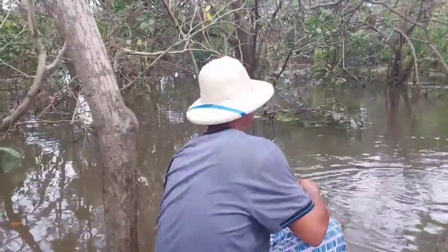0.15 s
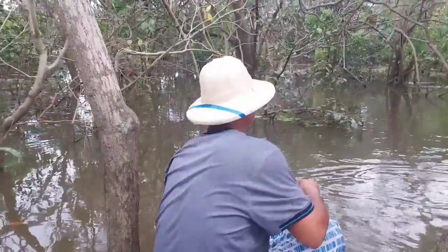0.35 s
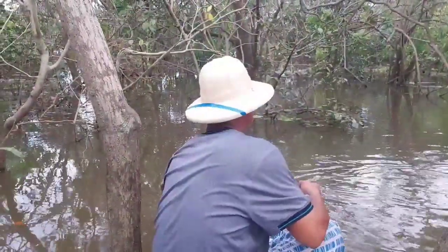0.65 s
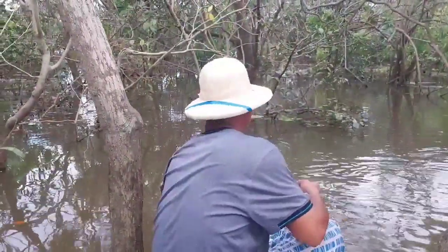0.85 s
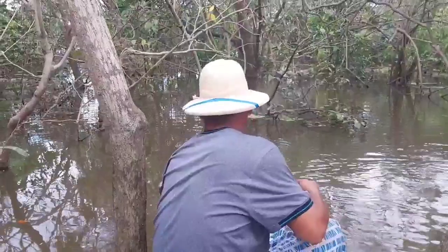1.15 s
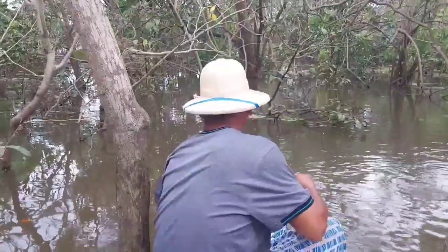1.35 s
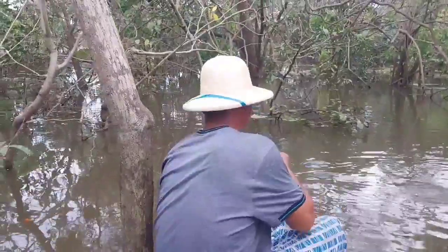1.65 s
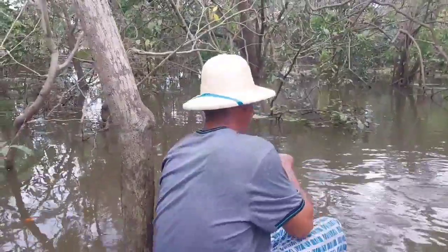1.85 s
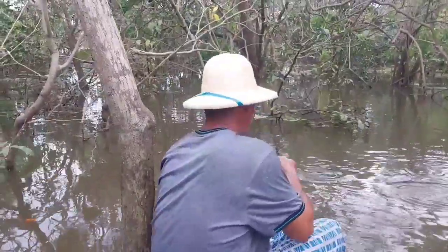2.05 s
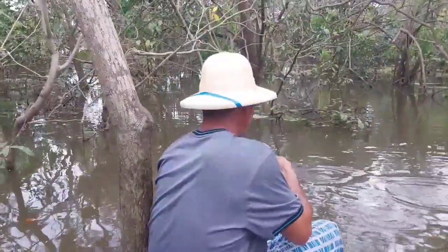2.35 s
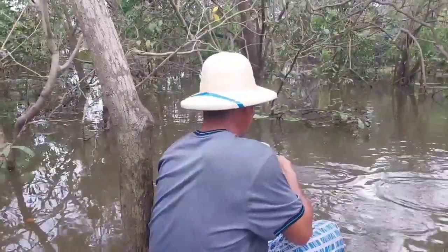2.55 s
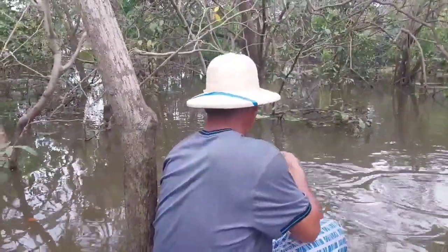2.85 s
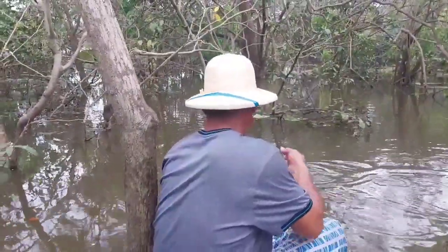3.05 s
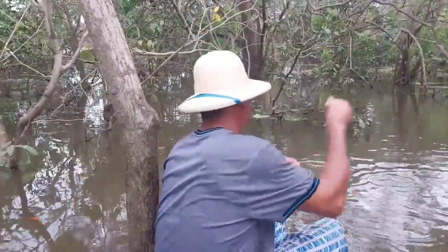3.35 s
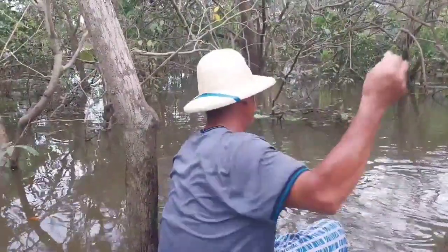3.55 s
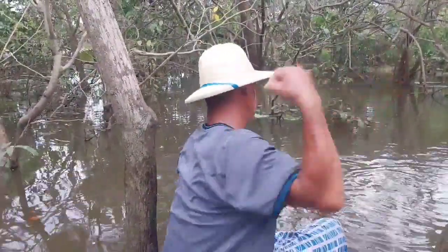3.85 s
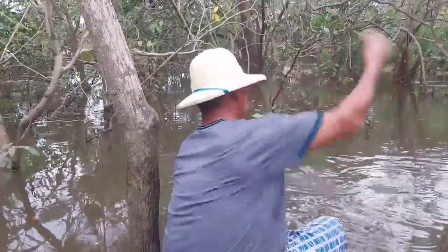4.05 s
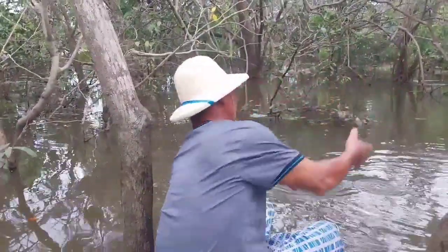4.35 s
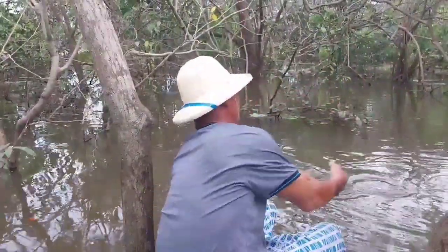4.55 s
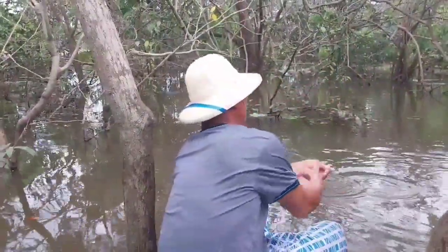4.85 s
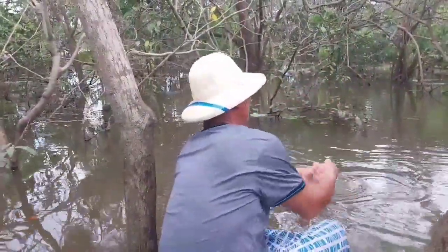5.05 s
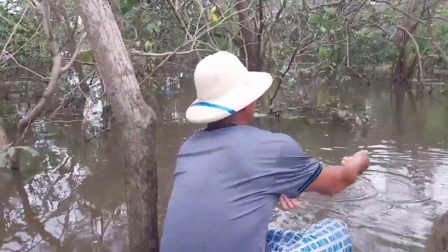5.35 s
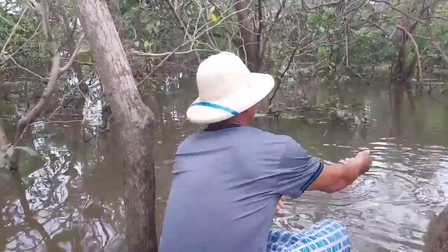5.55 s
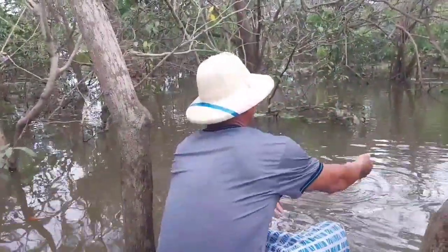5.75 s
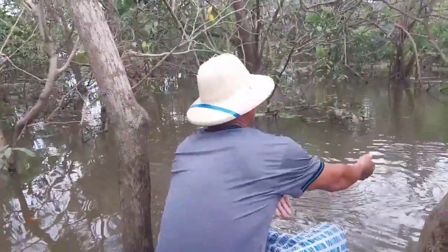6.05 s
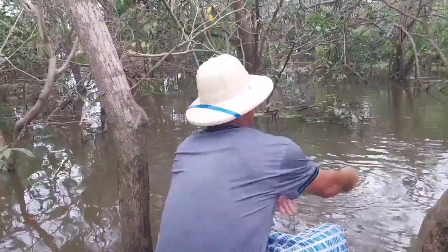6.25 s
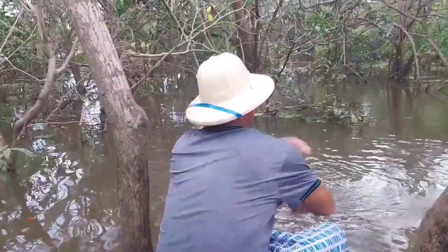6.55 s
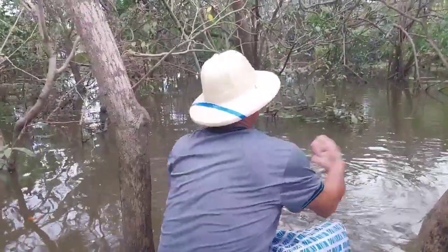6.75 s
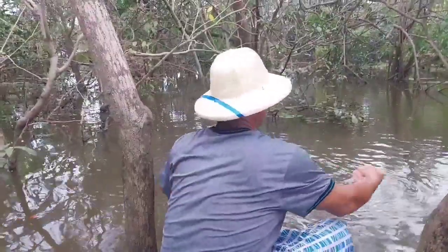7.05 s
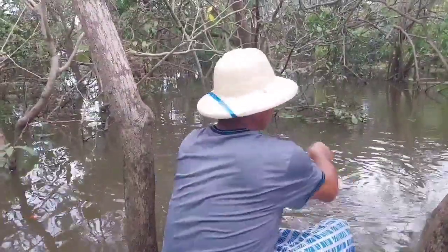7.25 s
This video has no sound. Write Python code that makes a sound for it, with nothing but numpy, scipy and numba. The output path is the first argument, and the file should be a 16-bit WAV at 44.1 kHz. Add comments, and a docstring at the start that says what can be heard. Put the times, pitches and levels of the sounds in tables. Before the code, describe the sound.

Close water beside a small wooden boat: quiet at first under steady insect buzz, then isolated slaps with soft hollow hull knocks, a busier cluster near four seconds, a calmer trickle of bubbles, and a loud gurgling slosh near the end. High insects drone and throb all around, over faint low rumble. Stereo handheld pickup in open flooded woodland, water nearer the right.

```python
"""Flooded forest: a small wooden boat beside a phone with two microphone ports, the water nearer the right.
Wavelets thump the hull as damped modes; slaps and spray are bursts of short ringing droplets; bubbles and
brief water ticks are short damped tones; churned water is a dense gurgle over hiss. A low and a high insect
buzz over a wide noise chorus, a small caller chirps far off, and a low rumble with a faint hum lies under it all."""
import sys
import numpy as np
from scipy import signal
from scipy.fft import rfft, irfft
from scipy.io import wavfile
from scipy.ndimage import uniform_filter1d, map_coordinates
from numba import njit

SR = 44100
rng = np.random.default_rng(int(sys.argv[2]) if len(sys.argv) > 2 else 0)


def master_out(mix):
    """Clip the mix to full scale and print it as 16-bit PCM to the path in sys.argv[1]."""
    frames = np.transpose(np.atleast_2d(mix))
    ceiling = np.clip(frames, -1, 1)
    pcm = np.round(ceiling * 32767).astype(np.int16)
    wavfile.write(sys.argv[1], SR, pcm)


N = 325899
T = np.arange(N) / SR

# Water levels are in dB before the common water gain.
# Hull thumps. Each row: start in s, level in dB, push on the lowest mode in ms, upper modes' share in dB.
HULL_THUMPS = [(1.52, -30.5, 31, -9), (2.484, -29, 23, -15), (3.11, -39, 46, -6), (3.295, -47.5, 36, -7),
               (3.538, -33, 49, -2.5), (3.882, -27.5, 12, -23.5), (4.071, -27.5, 14, -6),
               (4.228, -43.5, 12, -0.5), (4.243, -30.5, 10, -20), (4.369, -28, 36, -16),
               (4.778, -39.5, 33, -25), (5.78, -55.5, 61, 3.5), (6.742, -31.5, 7.4, 2)]
# Hull modes, the first two being the lower ones. Each row: frequency in Hz, level in dB, t60 in s.
HULL_MODES = [(105.4, -6, 0.097), (138.6, -12, 0.23), (215.3, 1, 0.11), (296.2, -5, 0.17),
              (343.6, -5.5, 0.089), (455, -13, 0.13)]
# Slaps on wood. Each row: start in s, level in dB, centre in Hz, nominal spread in octaves.
WATER_SLAPS = [(1.234, -47.5, 2540, 0.048), (1.35, -48.5, 2110, 3.34), (1.538, -31, 2150, 1.47),
               (1.635, -55, 5400, 0.19), (1.744, -56, 4200, 0.22), (2.18, -58, 1670, 1.8),
               (2.265, -44.5, 3770, 0.096), (2.504, -30.5, 2460, 1.77), (2.524, -31, 1530, 1.5),
               (2.937, -53, 1484, 2.67), (3.008, -51.5, 4430, 0.52), (3.099, -47.5, 2660, 3.1),
               (3.222, -43.5, 4730, 0.59), (3.344, -43, 3150, 0.24), (3.552, -35.5, 2230, 0.15),
               (3.559, -25, 1400, 2.22), (3.61, -38, 3280, 0.46), (3.673, -38, 5200, 1.2),
               (3.789, -44.5, 3630, 0.33), (3.891, -55.5, 665, 1.8), (4.009, -36, 2400, 0.15),
               (4.087, -25, 2385, 0.39), (4.095, -24.5, 1520, 2.26), (4.178, -45, 3900, 0.6),
               (4.189, -34.5, 2810, 0.43), (4.226, -37.5, 1105, 1.2), (4.315, -39, 2200, 0.98),
               (4.335, -43, 2050, 0.2), (5.246, -49, 4880, 2.9), (5.553, -49, 3120, 0.18),
               (5.779, -48.5, 790, 1.92), (5.798, -47, 1530, 0.92), (6.31, -44.5, 5300, 0.14),
               (6.324, -49, 2520, 0.17), (6.678, -32, 2110, 1.5), (6.729, -32, 700, 1.4),
               (6.742, -25, 653, 1.08), (6.746, -37, 3030, 0.21), (6.764, -26.5, 676, 0.47),
               (6.786, -25, 1350, 1.86), (6.797, -23.5, 1430, 0.75), (6.927, -30, 3700, 0.16),
               (6.945, -36, 2350, 2.6), (7.038, -45, 1140, 0.93), (7.063, -31.5, 5730, 0.28),
               (7.076, -38, 3200, 0.18), (7.244, -37, 4980, 0.035), (7.348, -42.5, 3940, 0.18)]
# Spray pops. Each row: start in s, nominal level in dB.
SPRAY_POPS = [(1.207, -56), (1.538, -39), (2.178, -56), (2.504, -39.5), (2.525, -43), (3.098, -51),
              (3.225, -38), (3.349, -49), (3.56, -28), (3.671, -47), (3.792, -40), (3.843, -42),
              (4.009, -51), (4.096, -19.5), (5.291, -44), (5.601, -36.5), (6.053, -46), (6.324, -48),
              (6.648, -39.5), (6.682, -36), (6.766, -38), (6.796, -43), (6.925, -32), (6.965, -33.5),
              (7.009, -45), (7.063, -41), (7.188, -46), (7.363, -42)]
# Bubbles and brief water ticks. Each row: start in s, start pitch in Hz, nominal length in ms, level in dB,
# extra upward glide 0-1.
BUBBLES_AND_TICKS = [(1.345, 636, 24, -61.5, 0), (1.378, 500, 9.6, -62, 0.09),
                     (1.405, 517, 28, -64.5, 0.42), (1.538, 3900, 2, -47, 0), (1.54, 1600, 5.4, -36, 0),
                     (2.295, 1330, 5.5, -57.5, 0), (2.503, 6500, 1.6, -40, 0), (2.527, 1690, 7.5, -36, 0),
                     (2.532, 4100, 2, -35.5, 0), (3.104, 492, 65, -63, 0.93), (3.222, 1150, 14, -61, 0),
                     (3.28, 1430, 15, -67, 0.23), (3.3, 2054, 8.4, -55, 0.11), (3.35, 1325, 37, -62, 0.06),
                     (3.567, 1260, 6.3, -38, 0), (3.578, 5100, 2.3, -46, 0), (3.594, 3620, 2.5, -49, 0),
                     (3.954, 1600, 4.7, -55, 0.078), (4.03, 2070, 15, -53, 0.5), (4.096, 3870, 2.8, -40, 0),
                     (4.098, 1530, 4, -33, 0), (4.145, 1550, 11, -53, 1), (4.205, 1320, 10, -59, .6),
                     (4.226, 626, 9.4, -46, 0), (4.236, 900, 10, -47.5, 0.74), (4.27, 715, 16, -62, 0.5),
                     (4.282, 1460, 7.3, -55.5, .3), (4.293, 890, 11, -55, 0), (4.319, 2500, 4, -38, 0),
                     (4.337, 696, 12, -55, 0.63), (4.35, 716, 12, -55, 0.84), (4.368, 644, 13.5, -51, 0),
                     (4.436, 1240, 9.9, -57, 0.91), (5.25, 680, 8.8, -63, 0.23),
                     (5.371, 275, 85, -56.5, 0.88), (5.312, 830, 6.8, -64, 0), (5.49, 820, 41, -63, 0.1),
                     (5.579, 1170, 8, -61, 0.09), (5.61, 1160, 14, -57, 0.21), (5.66, 1250, 14, -59, 0),
                     (5.939, 1336, 18, -44, 0.28), (6.241, 1101, 12, -58, 0.45),
                     (6.293, 740, 68, -59, 0.061), (6.334, 798, 52, -55.5, 1),
                     (6.344, 2370, 14, -57.5, 0.36), (6.45, 1270, 37, -58.5, 0.78),
                     (6.661, 5730, 2.2, -29.5, 0), (6.899, 6600, 1.3, -33, 0),
                     (6.681, 1360, 6.8, -29.5, 0.41), (6.781, 268, 34, -37.5, 0.085),
                     (6.785, 2680, 5.9, -40, 0), (6.797, 2270, 4.9, -44, 0), (6.943, 3500, 4.5, -39, 0),
                     (6.966, 612, 40, -47, .9), (6.987, 1063, 16, -36.5, 0.22),
                     (7.008, 636, 22, -38.5, 0.77), (7.03, 834, 26, -39.5, 1),
                     (7.034, 2230, 6.2, -35, 0.081), (7.076, 3100, 4.7, -45, 0.19),
                     (7.096, 1043, 17, -37.5, 0), (7.284, 554, 5.7, -58, 0.043)]
# Sloshes that churn the water. Each row: full at s, hold in s, gurgle gain in dB, spray gain in dB.
CHURN_SLOSHES = [(1.225, .15, -74, -83), (1.481, 0.028, -77, -90), (1.545, .015, -62, -81),
                 (1.6, .1, -78.5, -82), (2.209, 0.11, -78.5, -84), (2.514, 0.0074, -56, -65),
                 (2.947, 0.072, -75, -88), (3.126, 0.23, -69.5, -79), (3.564, 0.0071, -52.5, -61),
                 (3.768, 0.15, -75, -68), (3.978, 0.092, -68, -84), (4.087, 0.038, -58.5, -62.5),
                 (4.213, .19, -62.5, -75.5), (4.439, .12, -77, -84), (5.277, 0.076, -76.5, -90),
                 (5.514, 0.12, -65.5, -70.5), (5.809, 0.23, -73.5, -85), (6.279, 0.18, -68.5, -73),
                 (6.67, 0.1, -52, -58), (6.779, 0.0093, -39.5, -57.5), (6.85, 0.11, -52, -58.5),
                 (6.993, 0.097, -47, -55.5), (7.195, 0.17, -75, -72)]
# Spectrum of churned water. Each row: frequency in Hz, density in dB per Hz.
WASH_SPECTRUM = [(300, 23), (700, -3.5), (1500, 6.5), (3500, 4.5), (6500, 2.5), (12000, -4)]
# Delay of the water at the left port. Each row: time in s, delay in ms.
LEFT_PORT_DELAY = [(0, 0.17), (4.3, 0.19), (5.3, 0.24), (6.78, 0.327), (7.39, 0.29)]
# Shading of the left port by the phone. Each row: frequency in Hz, gain in dB.
LEFT_PORT_SHADE = [(100, -2), (700, -4), (2400, -2.5), (8000, -5), (15000, -9)]
# Low buzzer: body in Hz, body width in Hz, level in dB, blur level before that level in dB.
LOW_BUZZ_BODY = (6882, 476, -54, -1.5)
# Low buzzer's brief rests. Each row: middle in s, half length in s, gain in dB.
LOW_BUZZ_RESTS = [(0.33, 0.1, -4.5), (0.827, 0.099, -6), (1.3, 0.047, -11), (1.73, 0.042, -6),
                  (2.215, 0.035, -12), (2.65, 0.053, -16), (3.114, 0.045, -11), (3.525, 0.03, -4),
                  (4.01, 0.038, -13), (4.457, 0.038, -12), (4.9, 0.058, -12), (5.37, .065, -8.5),
                  (5.807, 0.046, -9), (6.258, 0.044, -14), (6.702, 0.037, -10), (7.154, 0.046, -6)]
# High buzzer: tone in Hz, throbs per s, noise width in Hz, throb depth 0-1.
HIGH_BUZZ_TONE = (9125, 40, 186, 0.31)
# High buzzer's phrases. Each row: full at s, hold in s, gain in dB.
HIGH_BUZZ_PHRASES = [(0.14, 1.18, -52.5), (1.625, 1.03, -51.5), (3.363, 0.99, -50.5), (5.374, 1.04, -51),
                     (6.894, 0.53, -51.5)]
# Far chirps. Each row: start in s, level in dB.
FAR_CHIRPS = [(0.0478, -57.5), (0.1406, -60.5), (0.2423, -61), (0.3416, -64), (0.4499, -60.5)]
# Spectrum of the distant chorus. Each row: frequency in Hz, density in dB per Hz.
CHORUS_SPECTRUM = [(400, -19.5), (1000, -26.5), (3600, -33.5), (4300, -29), (5000, -11), (5800, -21),
                   (6550, -4.5), (7400, -14.5), (8200, -5.5), (8800, -1.5), (9900, -10.5), (10400, -27.5),
                   (11500, -34), (13200, -19), (15300, -31)]
# Thin voices in the chorus. Each row: frequency in Hz, level in dB.
CHORUS_SINGERS = [(8570, -70), (8810, -61)]
# Spectrum of the low rumble. Each row: frequency in Hz, density in dB per Hz.
RUMBLE_SPECTRUM = [(25, -15), (40, -9.5), (52, 3.5), (75, 1.5), (100, 0.5), (190, -4.5), (260, -13.5),
                   (310, -22.5), (420, -36), (700, -69)]
# Faint hum. Each row: time in s, level in dB.
HUM_LEVEL = [(0, -60.5), (4.6, -60.5), (6.2, -69.5), (7.39, -64)]

SCATTER_MS, POP_HZ = 8, 11660  # time scale of falling droplets; centre of spray pops
DRIFT_OCT_PER_S, CLIMB_OCT_PER_S, CLIMB_REF_HZ = 1.9, 17, 630  # all glide up slightly; low climbers fastest
SWELL_DB_PER_S, SETTLE_DB_PER_S = 650.5, 215
CALM_DB, CALM_SPRAY_DB = -94, -101  # between sloshes
FOREST_T60_S, FOREST_DB, WATER_DB = 0.16, -14.5, 3.5
CLICKS_PER_S = 122.8
PHRASE_IN_DB_PER_S, PHRASE_OUT_DB_PER_S, BETWEEN_PHRASES_DB = 47, 67, -70.5
CHORUS_DB, RUMBLE_DB = -57.0, -47.5
HUM_HZ, TOP_HZ = 250, 15700


def thumps():
    """A wavelet leans on the planks for a moment; they swing while it pushes, the low modes longest."""
    rows = []
    lowest_hz = HULL_MODES[0][0]
    for s, db, push_ms, upper_db in HULL_THUMPS:
        for k, (hz, mode_db, t60_s) in enumerate(HULL_MODES):
            hold_s = push_ms / 1000 * (lowest_hz / hz) ** 1.9
            size = undb(db + mode_db + upper_db * (k > 1))
            rows.append((s - 0.005, hz, 0.0, 0.008, hold_s, t60_s, size))
    return rings(np.array(rows), N)


def slaps():
    """Slaps on the planks, narrow ones ringing longer, each with weaker broad spatter; bright pops of spray."""
    s, db = np.transpose(SPRAY_POPS)[:, :, None]
    pops = burst(s, db + 9.5, POP_HZ, 1.0, 2.9, cycles=14.4, count=10)
    s, db, hz, octs = np.transpose(WATER_SLAPS)[:, :, None]
    spatter = burst(s, db - 20.0, hz, 2.736, 2.5 * SCATTER_MS, cycles=53.0, count=28)
    strikes = burst(s, db, hz, octs, SCATTER_MS, cycles=4 + 3.1 / (octs + 0.041), count=20)
    return strikes + spatter + pops


def bubbles_and_ticks():
    """Short damped tones: bubbles that rise in pitch, and ticks of a few ms; random level walk roughens them."""
    s, hz, ms, db, climb = np.transpose(BUBBLES_AND_TICKS)
    length_s = ms / 1000
    glide = DRIFT_OCT_PER_S + climb * CLIMB_OCT_PER_S * (CLIMB_REF_HZ / hz) ** 0.24
    rows = np.stack([s, hz, glide, 0.1 * length_s, 0.5 * length_s, 2.5 * length_s, undb(db)], axis=1)
    return rings(rows, N) * (1 + 0.7 * walk(250))


def wash(count=4500):
    """Dense gurgle of small bubbles over hiss and spray, all riding the churn."""
    s, hold, body_db, spray_db = np.transpose(CHURN_SLOSHES)
    body = swells(s, hold, body_db, SWELL_DB_PER_S, SETTLE_DB_PER_S, CALM_DB)
    spray = swells(s, hold, spray_db, SWELL_DB_PER_S, SETTLE_DB_PER_S, CALM_SPRAY_DB)
    u = rng.random((count, 4)).T
    crowd = np.sqrt(body) / np.mean(np.sqrt(body))  # stronger churn makes more bubbles
    start_s = np.interp(u[0], np.cumsum(crowd) / N, T)
    hz = 520 * 2 ** (4.2 * u[1] ** 0.8)
    cycles = 14 + 50 * u[2] ** 2
    size = undb(-2.2 * np.log(1 - u[3]))
    rows = np.stack([start_s, hz, 0.45 * hz / cycles, 3.0 / hz, 0 * hz, cycles / hz, size], axis=1)
    gurgle = level(colour(rings(rows, N) / np.sqrt(crowd), WASH_SPECTRUM), 0.12)
    hiss = level(colour(rng.standard_normal(N), WASH_SPECTRUM), -10)
    mist = level(band(rng.standard_normal(N), 11000, 8000), 3) * undb(7 * walk(150))
    return body * undb(5.4 * walk(40)) * (gurgle + hiss) + spray * mist


def water():
    """Near water reaches the right port first; wash along the hull differs per port; trunks return a short tail."""
    near = thumps() + slaps() + bubbles_and_ticks() + wash()
    lag_ms, = curve(LEFT_PORT_DELAY)
    left = map_coordinates(colour(near, LEFT_PORT_SHADE), [np.arange(N) - lag_ms * SR / 1000], order=3)
    along = np.array([colour(wash(), LEFT_PORT_SHADE), wash()])
    along = colour(along, [(800, -13.0), (2500, -0.5), (5000, 4), (12000, -1)])  # Hz, dB
    t = T[:SR // 2]
    tail = rng.standard_normal((2, len(t))) * 1000 ** (-t / FOREST_T60_S)
    tail *= undb(FOREST_DB) / np.sqrt(np.sum(tail ** 2, axis=1, keepdims=True))
    far = signal.sosfilt(signal.butter(1, 500, "high", fs=SR, output="sos"), near)
    echo = signal.fftconvolve(far[None], tail, axes=1)[:, :N]
    return undb(WATER_DB) * (np.array([left, near]) + along + echo)


def low_buzzer():
    """Nearly even clicks ring a small body; foliage blurs them differently for each port."""
    hz, width_hz, db, blur_db = LOW_BUZZ_BODY
    phase = np.cumsum(CLICKS_PER_S * (1 + 0.003 * walk(6))) / SR
    clicks = np.diff(np.floor(phase), prepend=0) * undb(0.71 * walk(65))
    gate = 0.5 + np.exp(-(phase % 1) / 3.5)
    clear = level(band(band(clicks, hz, width_hz), hz, width_hz), -3.8)
    rests_db = sum(rest_db * np.exp(-((T - s) / half_s) ** 2) for s, half_s, rest_db in LOW_BUZZ_RESTS)
    effort = undb(db + rests_db)
    ports = []
    for k in range(2):
        blur = level(band(gate * rng.standard_normal(N), hz - 200, 1.08 * width_hz), blur_db)
        ports.append(effort * (np.roll(clear, 5 * k) + blur))  # clicks 5 samples later on the right
    return ports


def high_buzzer():
    """A thin, wavering tone that throbs, with narrow noise around it."""
    hz, throbs_per_s, width_hz, depth = HIGH_BUZZ_TONE
    throb_turns = np.cumsum(throbs_per_s * (1 + 0.043 * walk(23.47))) / SR
    throb = 1 + depth * np.cos(2 * np.pi * throb_turns)
    tone = np.sqrt(2) * np.sin(2 * np.pi * np.cumsum(hz + 30 * walk(30)) / SR)
    phrases = swells(*np.transpose(HIGH_BUZZ_PHRASES), PHRASE_IN_DB_PER_S, PHRASE_OUT_DB_PER_S,
                     BETWEEN_PHRASES_DB)
    effort = phrases * undb(2 * walk(19))
    ports = []
    for _ in range(2):
        blur = level(band(rng.standard_normal(N), hz, width_hz), -8.0)
        ports.append(effort * throb * (undb(-7.5) * tone + blur))
    return ports


def chirps():
    """Short falling chirps, each trailing a wash of echoes made of decaying band noise."""
    rows = [(s, 5650, -17.0, 0.003, 0.004, 0.03, undb(db)) for s, db in FAR_CHIRPS]
    clear = rings(np.array(rows), N)
    gate = sum(undb(db) * (T >= s) * 1000 ** (-np.clip(T - s, 0, 2) / 0.57) for s, db in FAR_CHIRPS)
    return [clear + gate * level(band(rng.standard_normal(N), 4870, 420), 0) for _ in range(2)]


def forest():
    """Buzzers, chirps and a distant chorus; the chorus noise is unrelated at the two ports."""
    chorus = level(colour(rng.standard_normal((2, N)), CHORUS_SPECTRUM), CHORUS_DB)
    chorus = chorus * undb(2.3 * walk(1.63) + 2 * walk(50))
    singers = sum(level(band(rng.standard_normal((2, N)), hz, 80), db) * undb(1.4 * walk(3.04))
                  for hz, db in CHORUS_SINGERS)
    return (chorus + singers + low_buzzer() + high_buzzer() + chirps()) * undb([[-1.5], [1.5]])


def rumble():
    """Low rumble in two swelling bands, nearly alike at both ports, with a faint wavering hum."""
    mid, side = (colour(rng.standard_normal(N), RUMBLE_SPECTRUM) for _ in range(2))
    swell = [undb(0.15 * walk(3.6) + 2 * walk(8)) for _ in range(2)]
    deep = signal.sosfiltfilt(signal.butter(2, 130, fs=SR, output="sos"), mid)
    mid = deep * swell[0] + (mid - deep) * swell[1]
    noise = level(mid + undb(-12.5) * side * np.array([[1], [-1]]), RUMBLE_DB)
    hum_db, = curve(HUM_LEVEL)
    hum_tone = np.sqrt(2) * np.sin(2 * np.pi * np.cumsum(HUM_HZ + 2.47 * walk(1.6)) / SR)
    hum = undb(hum_db + 2 * walk(2.21)) * hum_tone
    return (noise + hum) * undb([[-1.1], [1.1]])


def burst(s, db, hz, octs, ms, cycles, count):
    """Each event bursts into droplets around its centre pitch, densest and loudest at the start."""
    late, off, weak = rng.random((len(s), 3, count)).transpose(1, 0, 2)
    order = np.arange(count) / count
    late = -np.log(1 - late) * order
    off = (order * count * (np.sqrt(5) - 1) / 2 + off / 4) % 1  # golden-ratio steps spread pitches evenly
    pitch = np.clip(hz * 2 ** (1.66 * octs * (off - 0.5) * (order > 0)), 300, 15000)
    size_db = db - 6.0 - 1.17 * late - 9.3 * weak + 8.6 * (order == 0)
    size = undb(size_db) * (pitch / hz) ** 0.25
    start_s = s + late * ms / 1000
    rows = np.stack([start_s, pitch, pitch / 80, 2.2 / pitch, 0 * pitch, cycles / pitch, size], axis=-1)
    return rings(rows.reshape(-1, 7), N)


@njit
def rings(rows, out):
    """Damped tones from rows (s, Hz, octaves per s, rise s, hold s, t60 s, size); glides end early in the decay."""
    y = np.zeros(out)
    for s, hz, glide, rise, hold, t60, size in rows:
        z, turn = 1 + 0j, 2 * np.pi * hz / SR
        for i in range(int((rise + hold + .8 * t60) * SR)):
            t = i / SR
            bend = 2 ** (glide * min(t, rise + hold + .4 * t60))
            z *= np.exp(1j * min(turn * bend, 2.8))  # cap below Nyquist
            swing_in = np.sin(np.pi / 2 * min(t / rise, 1.)) ** 2
            fade = swing_in * 1000 ** (-max(t - rise - hold, 0.) / t60)
            y[min(int(s * SR) + i, out - 1)] += size * fade * z.imag
    return y


def swells(s, hold, db, rise_db, fall_db, rest_db):
    """Gain over time of events that rise, hold and fall at fixed dB per s above a resting level."""
    t = T[::64, None]
    each = undb(db - rise_db * np.clip(s - t, 0, None) - fall_db * np.clip(t - s - hold, 0, None))
    total = np.sqrt(np.sum(each ** 2, axis=1) + undb(rest_db) ** 2)
    return np.interp(T, t[:, 0], total)


def walk(rate):
    """Random levels held 1 / rate s and smoothed twice."""
    k = int(SR / rate)
    steps = np.repeat(rng.standard_normal(N // k + 1), k)
    return uniform_filter1d(uniform_filter1d(steps, k), k)[:N]


def colour(x, points):
    """Filter by (Hz, dB) points joined on a log axis."""
    hz, db = np.transpose(points)
    axis = np.arange(N // 2 + 1) * SR / N + 1
    return irfft(rfft(x) * undb(np.interp(np.log(axis), np.log(hz), db)), N)


def band(x, hz, width_hz):
    """Band-pass around hz."""
    edges_hz = [hz - width_hz / 2, hz + width_hz / 2]
    return signal.sosfilt(signal.butter(2, edges_hz, "band", fs=SR, output="sos"), x)


def curve(rows):
    """Columns of a table joined by straight lines in time."""
    s, *columns = np.transpose(rows)
    return [np.interp(T, s, c) for c in columns]


def level(x, db):
    """Scale to an RMS level in dB."""
    return x * undb(db) / np.sqrt(np.mean(x ** 2))


def undb(db):
    """Amplitude ratio from dB."""
    return 10 ** (np.asarray(db) / 20)


def scene():
    """Water, forest and rumble at the left and right ports."""
    return water() + forest() + rumble()


def record(dry):
    """The phone drops the deepest bass and cuts the top."""
    dry = signal.sosfilt(signal.butter(2, 40, "high", fs=SR, output="sos"), dry)
    return signal.sosfilt(signal.ellip(10, 0.2, 80, TOP_HZ, fs=SR, output="sos"), dry)


dry = scene()
out = record(dry)
master_out(out)
```